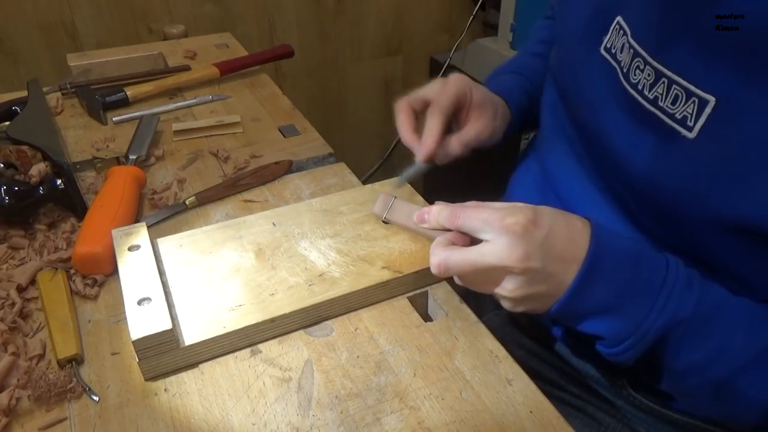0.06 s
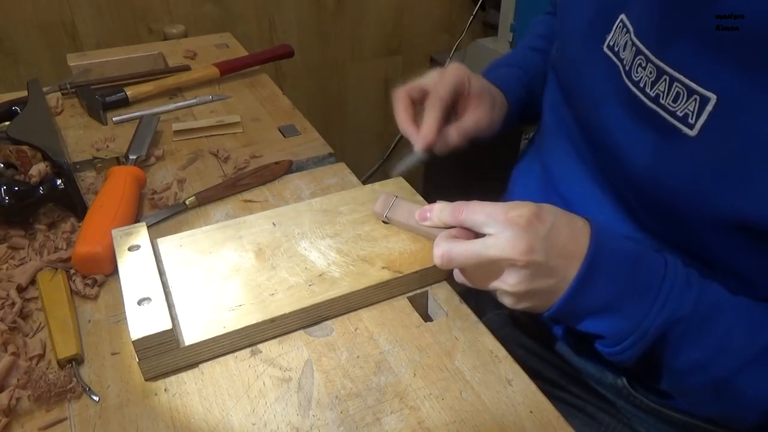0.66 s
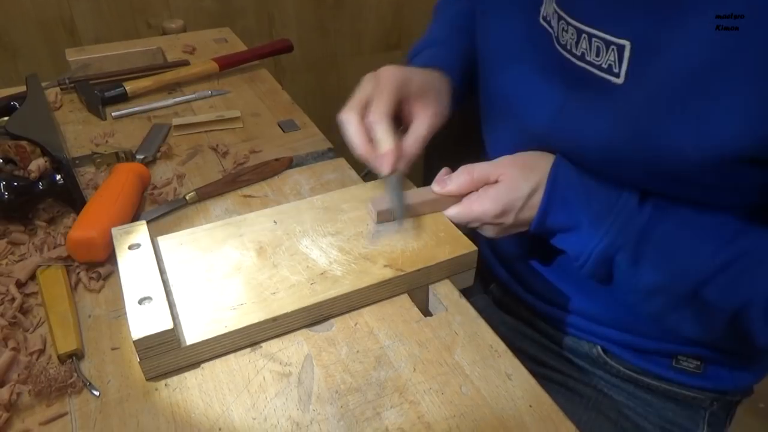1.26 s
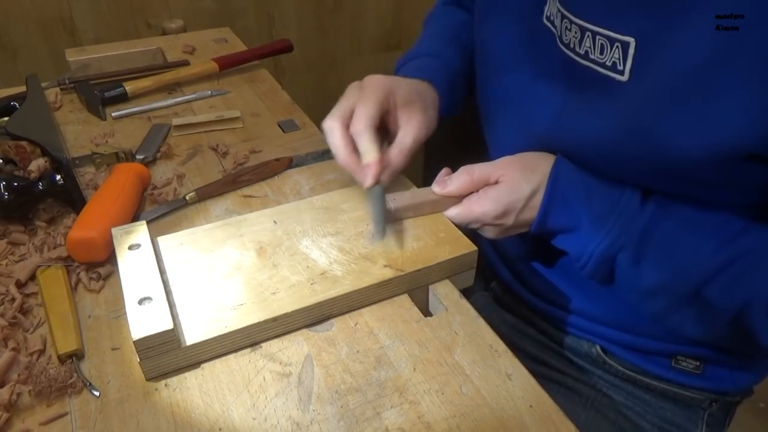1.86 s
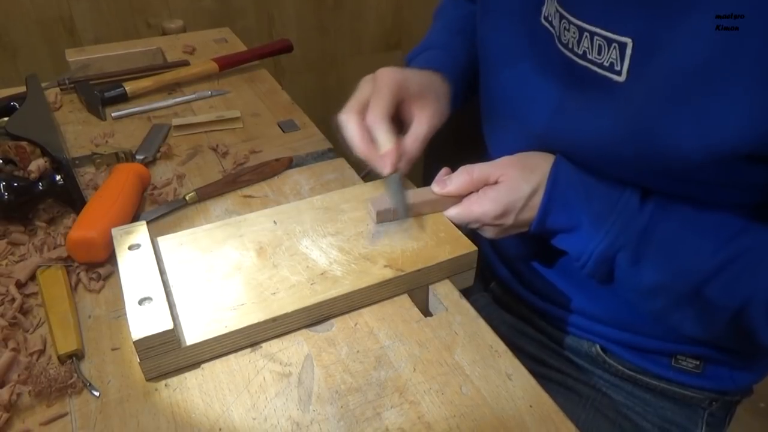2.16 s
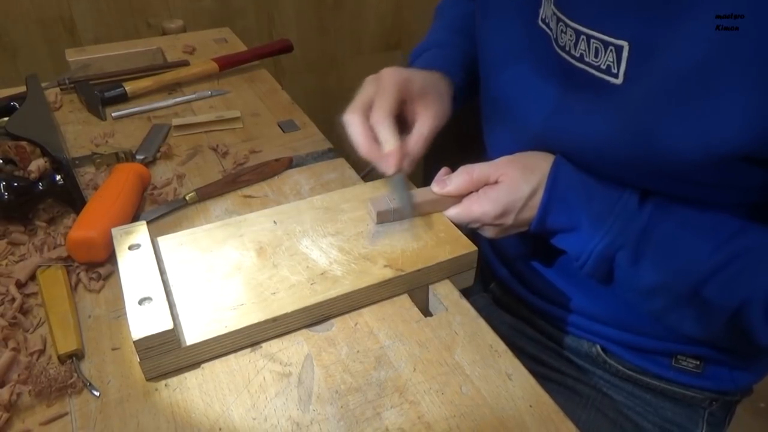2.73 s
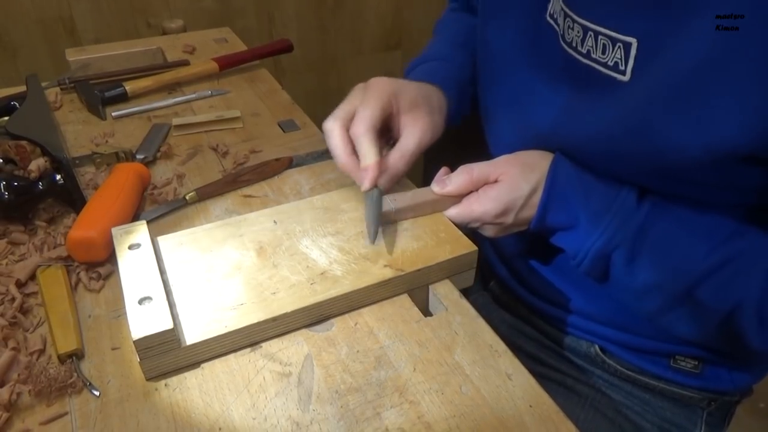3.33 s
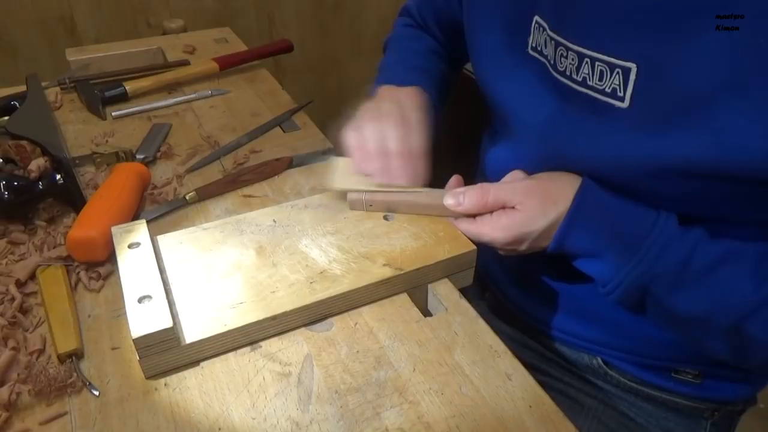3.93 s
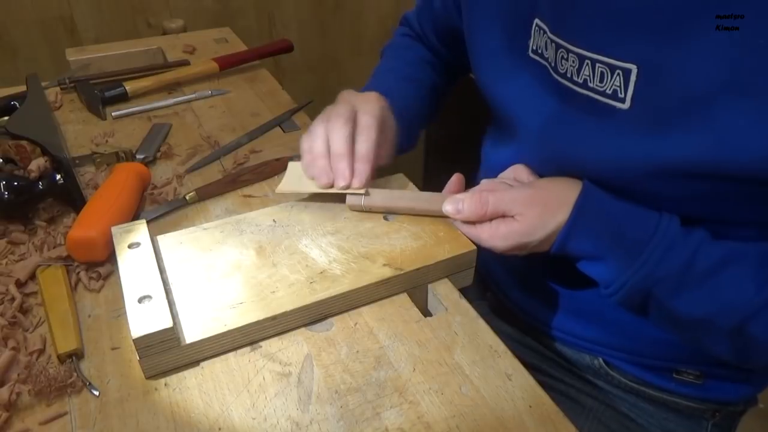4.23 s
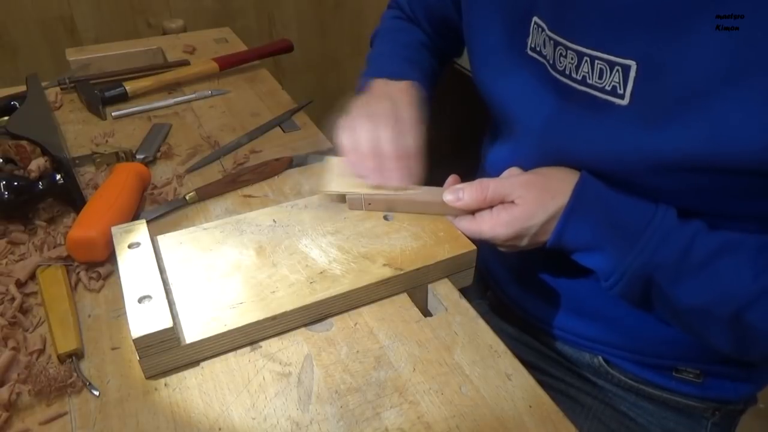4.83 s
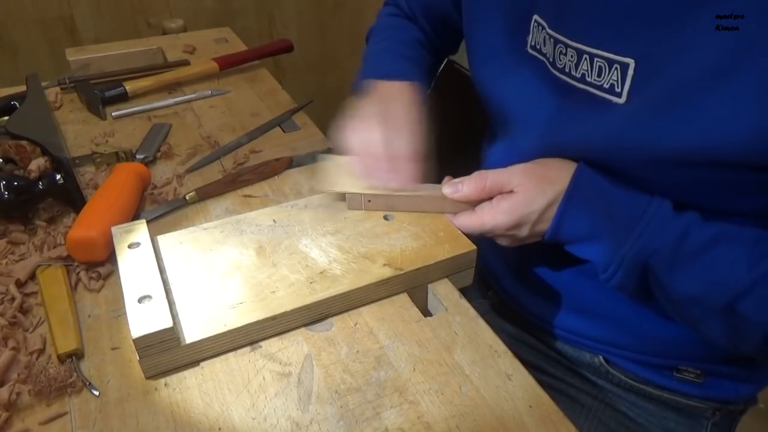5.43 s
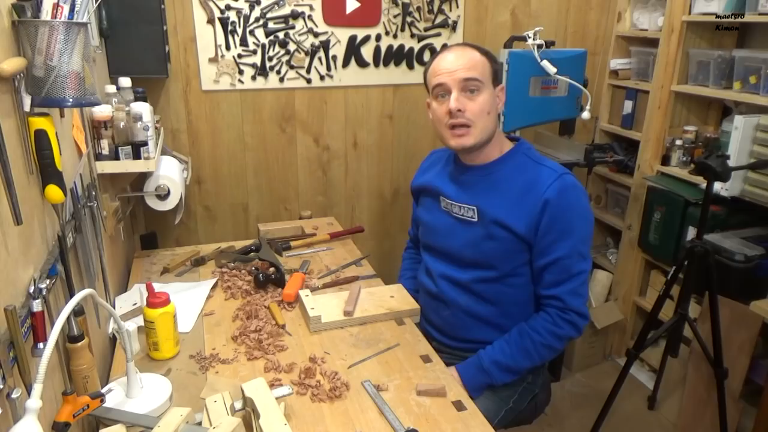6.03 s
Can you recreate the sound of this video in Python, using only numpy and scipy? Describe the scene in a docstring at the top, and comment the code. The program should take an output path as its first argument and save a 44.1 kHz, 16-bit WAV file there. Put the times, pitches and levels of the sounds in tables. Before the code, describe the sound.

A hand file scrapes across a wooden handle in two slow, groaning strokes, each starting with a light tick. It then speeds into quick, even back-and-forth rasping, with a few tiny squeaks and dull bumps of the handle against a board. Brisk sanding follows straight away, a bright rhythmic hiss. It all sounds close, in a small workshop with a faint hum.

```python
"""Filing and sanding a wooden handle.

Two slow file strokes, quick ones to and fro, then sandpaper. The teeth tick at a rate that follows
hand speed; the blade chatters lower as it slides out, higher as it is drawn back. Torn fibres and
grit scrape and hiss, the handle bumps the board now and then, and a small workshop hums faintly."""
import sys
import numpy as np
from scipy import signal
from scipy.fft import rfft, irfft, next_fast_len
from scipy.io import wavfile
from scipy.ndimage import uniform_filter1d

SR = 44100
rng = np.random.default_rng(int(sys.argv[2]) if len(sys.argv) > 2 else 0)


def master(y):
    """Save y as 16-bit WAV."""
    cut = np.clip(np.atleast_2d(y).T, -1, 1)
    pcm = np.round(cut * 32767)  # scale
    wavfile.write(sys.argv[1], SR, pcm.astype(np.int16))


N = 268121
TIME_S = np.arange(N) / SR

# room air spectrum: freq_hz, gain_db
AIR_SPECTRUM = [(15, -41), (25, -21), (54, -12), (118, -12), (131, -8.5), (150, -12.5), (219, -10.5),
                (250, -10.5), (309, -11.5), (415, -12), (462, -21.5), (2370, -35), (15000, -42.5)]
# mains hum partials: pitch_hz, level_db
MAINS_HUM = [(49.5, -60), (150, -53.5), (249, -61.5)]
# file lands on the wood: start_s, level_db
FILE_LANDINGS = [(0.192, -38), (0.817, -34)]
# slow file strokes: start_s, length_s, groan_s, groan_db, sing_db
SLOW_STROKES = [(0.193, 0.255, 0.378, -12.3, -17.5), (0.817, 0.268, 0.988, -11.2, -29)]
# slow scrape spectrum: freq_hz, gain_db
SLOW_SPECTRUM = [(200, -11), (350, 7), (700, -11), (1050, 4.5), (1400, -4.5), (1800, 1), (3000, -3),
                 (3700, 1.5), (4600, -5), (5500, -3.5), (8000, -11.5), (9400, -8), (10300, -15.5),
                 (16000, -21)]
# handle held in the air: freq_hz, width_hz, gain_db
HELD_WOOD_MODES = [(277, 23, 6.5), (361, 61, 2), (640, 56, -8.5), (760, 27, 0), (943, 44, -2),
                   (1280, 72, -29)]
# steel of the file: freq_hz, width_hz, gain_db
FILE_MODES = [(2590, 300, -9.5), (3460, 49, -0.5), (3900, 70, 3), (4950, 130, -13), (7400, 260, -16),
              (9600, 120, -33), (11200, 210, -11.5)]
# handle bumps the board: start_s, level_db, pitch_hz
HANDLE_BUMPS = [(0.437, -28, 327), (1.071, -22, 290), (1.758, -28, 230), (2.085, -28.5, 243),
                (2.108, -22, 124), (2.249, -25, 259), (2.994, -24, 106), (3.539, -30.5, 250),
                (6.044, -30, 130)]
# hiss of the file's smooth tip: freq_hz, gain_db
TIP_SPECTRUM = [(3000, -27), (7000, 2), (9500, 1), (11000, -8), (13000, 2), (14000, -10)]
# quick file strokes, push and pull in turn: start_s, scrape_db, chatter_db
QUICK_STROKES = [(1.266, -18.5, -25), (1.394, -21.5, -20), (1.513, -19.5, -19.5), (1.643, -21.5, -20),
                 (1.76, -19.5, -21.5), (1.885, -22.5, -21), (2.005, -19.5, -41), (2.132, -22.5, -27.5),
                 (2.246, -18.5, -28.5), (2.376, -22, -24), (2.496, -19, -26), (2.624, -22, -30),
                 (2.742, -19.5, -25.5), (2.869, -22, -20.5), (2.992, -19, -23), (3.114, -22.5, -19.5),
                 (3.233, -21, -33.5), (3.36, -22.5, -30.5), (3.48, -23.5, -34), (3.611, -24, -25.5),
                 (3.727, -23, -34.5)]
# push scrape spectrum: freq_hz, gain_db
PUSH_SPECTRUM = [(450, -16), (800, -8.5), (1600, 2), (2300, -13), (3000, -6), (4100, 7), (5400, -2.5),
                 (6300, 2.5), (7800, -10.5), (8700, -3.5), (10400, -7.5), (11200, -9), (12000, -11.5),
                 (16000, -18.5)]
# pull scrape spectrum: freq_hz, gain_db
PULL_SPECTRUM = [(450, -17), (800, 4.5), (1700, 6), (2300, -9), (3100, -4.5), (4150, 11.5), (5100, -4),
                 (6150, 12), (7700, -9), (9200, 2), (11000, -4), (16000, -12.5)]
# handle pressed on the board: freq_hz, width_hz, gain_db
PRESSED_WOOD_MODES = [(652.6, 37, 9.5), (729, 34, 1), (905, 43, 0.5), (992, 20, 10), (1048, 42, 8.5),
                      (1200, 32, -14), (1250, 49, -3), (1360, 25, -22), (1530, 42, -11), (1980, 93, 1)]
# tooth edge skids: start_s, length_s, first_hz, last_hz, level_db
TOOTH_SQUEAKS = [(2.005, 0.018, 1363, 1580, -20), (2.983, 0.036, 1590, 1660, -22),
                 (3.646, 0.0466, 1480, 2003, -20.5)]
# brief level dips: start_s, end_s
LEVEL_DIPS = [(3.79, 3.8), (6.029, 6.08)]
# sanding strokes, away and back in turn: start_s, hiss_db
SANDING_STROKES = [(3.799, -17.5), (3.916, -18), (4.038, -17.5), (4.154, -18), (4.268, -17.5),
                   (4.379, -18.5), (4.491, -16), (4.595, -17.5), (4.709, -16), (4.822, -16.5),
                   (4.938, -15.5), (5.056, -15.5), (5.17, -16), (5.283, -15.5), (5.397, -16), (5.506, -16),
                   (5.616, -17.5), (5.719, -17), (5.826, -17.5), (5.923, -17)]
# grit hiss spectrum: freq_hz, gain_db
HISS_SPECTRUM = [(2000, -34), (6000, -7), (7600, -11.5), (9000, -3), (10500, -2), (11900, -4),
                 (13300, -4.5), (16000, -5.5)]
# grit rubbing the wood: freq_hz, gain_db
RUB_SPECTRUM = [(500, -38), (900, -25), (1100, -24.5), (1300, -23), (1600, -8.5), (2250, -13.5), (3000, -3),
                (4500, -1.5), (6300, 0.5), (7400, -1.5), (12000, -7.5)]
# board rumble spectrum: freq_hz, gain_db
RUMBLE_SPECTRUM = [(50, -53), (180, -10.5), (350, -2), (520, 5), (700, -2.5), (1200, 2.5), (3000, -4)]
# how firmly the sanded handle lies on the board: time_s, rumble_db
RUMBLE_LEVELS = [(3.8, -14), (4.75, -15.5), (5.0, -28), (6.0, -57)]


def undb(db):
    """Decibels to gain."""
    return 10 ** (np.asarray(db) / 20)


def unit(x):
    """Scale to rms 1."""
    return x / np.sqrt(np.mean(x ** 2) + 1e-18)


def add(out, start_s, x):
    """Mix x into out from start_s."""
    i = int(start_s * SR)
    out[i:i + len(x)] += x[:N - i]


def walk(count, rate_hz):
    """Random drift, spread about 1."""
    steps = np.arange(count) * rate_hz / SR
    return np.interp(steps, np.arange(count), rng.standard_normal(count)) / np.sqrt(2 / np.pi)


def colour(x, spectrum):
    """Filter by a curve through (freq_hz, gain_db) points."""
    size = next_fast_len(len(x) + 1024)
    hz, db = np.transpose(spectrum)
    bins_hz = np.maximum(np.fft.rfftfreq(size, 1 / SR), 1)
    gain = undb(np.interp(np.log(bins_hz), np.log(hz), db))
    return irfft(rfft(x, size) * gain, size)[:len(x)]


def ring(x, modes):
    """Drive parallel resonances."""
    return sum(undb(db) * signal.lfilter(*signal.iirpeak(hz, hz / width_hz, SR), x)
               for hz, width_hz, db in modes)


def grains(count, spread_db, flutter_db, flutter_hz):
    """Tiny fractures of unequal size; the contact grips and loosens."""
    size_db = spread_db * walk(count, 5000) + flutter_db * walk(count, flutter_hz)
    return unit(rng.standard_normal(count) * undb(size_db))


def teeth(hz, jitter, slope_db, partials=8):
    """Uneven train of small catches; overtones change by slope_db per octave."""
    phase = 2 * np.pi * np.cumsum(hz * (1 + jitter * walk(len(hz), 406.1))) / SR
    train = np.zeros(len(hz))
    for k in range(1, partials + 1):
        gain = undb(slope_db * np.log2(k) + 3 * walk(len(hz), 66.3))
        train += gain * np.cos(k * phase + rng.uniform(0, 2 * np.pi))
    return unit(train)


def crest(t, peak_s, half_width_s):
    """Rise to 1 and fall, as when a glide crosses a resonance."""
    return 1 / (1 + ((t - peak_s) / half_width_s) ** 2)


def stroke(start_s, end_s, lead, coast_s, bite_s):
    """One hand sweep: time, speed (half sine, first fraction lead skipped) and rising grip."""
    t = np.arange(int((end_s - start_s + coast_s) * SR)) / SR
    speed = np.sin(np.pi * (lead + (1 - lead) * t / t[-1]))
    return start_s + t, np.maximum(speed, 1e-6), 1 - np.exp(-t / bite_s)


def swell(t, db):
    """Pressure shift over a stroke: gain from -db to +db."""
    return undb(db * np.linspace(-1, 1, len(t)))


def workshop():
    """Still air and faint mains hum."""
    air = undb(-46) * unit(colour(rng.standard_normal(N), AIR_SPECTRUM))
    hum = sum(undb(db + walk(N, 4.56)) * unit(np.sin(2 * np.pi * hz * TIME_S)) for hz, db in MAINS_HUM)
    return air + hum


def landings():
    """Steel lands on wood: dry tick, short ring."""
    out, t = np.zeros(N), TIME_S[:SR // 10]
    for start_s, db in FILE_LANDINGS:
        blow = rng.standard_normal(len(t)) * np.exp(-t / 0.0039)
        add(out, start_s, undb(db - 12) * unit(colour(blow, SLOW_SPECTRUM)))
        add(out, start_s, undb(db - 2.5) * unit(ring(blow, HELD_WOOD_MODES)))
    return out


def slow_filing():
    """Tooth rate climbs with hand speed, blade pitch sinks; each swells and rings the handle's modes."""
    first_hz, top_hz, speed_up_s, lift_s = 288.3, 643.4, 0.125, 0.061
    groan_hz, glide_oct_per_s = 374.8, -4.5
    out = np.zeros(N)
    for start_s, length_s, groan_s, groan_db, sing_db in SLOW_STROKES:
        t = start_s + np.arange(int(length_s * SR)) / SR
        tooth_hz = np.interp(t, [start_s, start_s + speed_up_s], [first_hz, top_hz])
        blade_hz = groan_hz * 2 ** (glide_oct_per_s * (t - groan_s))
        ticking = teeth(tooth_hz, jitter=0.058, slope_db=-21)
        blade = teeth(blade_hz, jitter=0.034, slope_db=-12.5)
        # teeth sing just before the blade groans
        tooth_gain = undb(-32.5) + undb(sing_db) * crest(t, groan_s - 0.026, half_width_s=0.013)
        blade_gain = undb(groan_db) * crest(t, groan_s, half_width_s=0.016)
        force = np.hypot(tooth_gain, blade_gain)
        catches = (tooth_gain * ticking + blade_gain * blade) / force
        tearing = undb(9) * grains(len(t), spread_db=2, flutter_db=2, flutter_hz=200)
        chatter = unit(ring(catches + tearing, HELD_WOOD_MODES) + catches)
        fibres = grains(len(t), spread_db=-1, flutter_db=0.5, flutter_hz=280) * (1 + 0.31 * catches)
        scrape = unit(colour(fibres, SLOW_SPECTRUM) + undb(-1.5) * ring(fibres, FILE_MODES))
        lift_off = np.clip((t[-1] - t) / lift_s, 0, 1) ** 2.7
        scrape_gain = undb(-25.5) * (tooth_hz / top_hz) ** 1.46 * lift_off
        add(out, start_s, signal.windows.tukey(len(t), 0.03) * (chatter * force + scrape * scrape_gain))
    return out


def bumps():
    """Handle meets board: one dull, damped tone."""
    out, t = np.zeros(N), TIME_S[:SR // 10]
    envelope = np.exp(-t / 0.0085) * (1 - np.exp(-t / 0.0031))
    for start_s, db, hz in HANDLE_BUMPS:
        add(out, start_s, undb(db) * np.sin(2 * np.pi * hz * t) * envelope)
    return out


def graze(spectrum, start_s, length_s, level_db):
    """Steel brushes the wood without biting: a brief hiss."""
    out, count = np.zeros(N), int(length_s * SR)
    hiss = unit(colour(rng.standard_normal(count), spectrum))
    add(out, start_s, undb(level_db) * np.hanning(count) * hiss)
    return out


def quick_filing():
    """Tooth rate arches with hand speed; the push cuts harder and brightens toward its end."""
    # pairs: push, pull
    stroke_s, swell_db, top_tooth_hz = (0.09, 0.082), (-1, -1.5), (1100, 1103)
    chatter_delay_s, glide_oct_per_s = (0.053, 0.039), (-9.5, 12.46)
    chatter_hz, stop_s = 1056, 3.79
    out = np.zeros(N)
    for k, (start_s, scrape_db, chatter_db) in enumerate(QUICK_STROKES):
        pull = k % 2
        end_s = min(start_s + stroke_s[pull], stop_s)
        t, speed, grip = stroke(start_s, end_s, lead=0.12, coast_s=0.009, bite_s=0.002)
        top_hz = top_tooth_hz[pull] * (1 + 0.06 * rng.standard_normal())
        # hand drags unevenly; teeth bite and skip
        drag = 1 + 0.035 * walk(len(t), 55)
        biting = np.clip(1 + 0.4 * walk(len(t), 70), 0, 1.3)
        zipping = biting * teeth(top_hz * drag * speed ** 0.8, jitter=0.019, slope_db=-1.2)
        fibres = grains(len(t), spread_db=1.5, flutter_db=0.8, flutter_hz=255)
        cutting = fibres + undb(-3.5) * zipping
        # slightly new file angle each stroke
        spectrum = [(hz, db + 1.5 * rng.standard_normal())
                    for hz, db in (PULL_SPECTRUM if pull else PUSH_SPECTRUM)]
        scrape = colour(cutting, spectrum) + ring(cutting, FILE_MODES)
        if not pull:
            treble = colour(scrape, [(6000, -22), (8000, -0.5)])
            scrape += treble * (swell(t, db=4.5) - 1)
        force = unit(grip * np.tanh(1.6 * speed) ** 1.37 * swell(t, swell_db[pull]))
        add(out, start_s, unit(scrape) * force * undb(scrape_db))
        # free blade length grows on the push, shrinks on the pull: pitch glides
        peak_s = start_s + chatter_delay_s[pull]
        glide_oct = glide_oct_per_s[pull] * rng.uniform(0.7, 1.3) * (t - peak_s)
        blade_hz = chatter_hz * (1 + 0.05 * rng.standard_normal()) * drag * 2 ** glide_oct
        blade = teeth(blade_hz, jitter=0.045, slope_db=-19, partials=2)
        # chatter peaks amid the wood's modes
        envelope = grip * (np.exp(-((t - peak_s) / 0.014) ** 2) + 0.52 * speed)
        chatter = blade * envelope * undb(2.8 * walk(len(t), 220))
        add(out, start_s, unit(chatter + 0.5 * ring(chatter, PRESSED_WOOD_MODES)) * undb(chatter_db))
        # cutting keeps the wood ringing
        wood = ring(np.pad(grip * speed ** 0.039 * cutting, (0, len(t))), PRESSED_WOOD_MODES)
        add(out, start_s, unit(wood) * undb(scrape_db - 15))
    return out


def squeaks():
    """A tooth edge skids: short rising chirps."""
    out = np.zeros(N)
    for start_s, length_s, first_hz, last_hz, db in TOOTH_SQUEAKS:
        hz = np.linspace(first_hz, last_hz, int(length_s * SR))
        chirp = teeth(hz, jitter=0.044, slope_db=-10.5, partials=2)
        add(out, start_s, undb(db) * np.hanning(len(hz)) * chirp)
    return out


def dips():
    """Gain that dips briefly at the listed times."""
    depth_db, fade_s = -13.5, 0.0053
    inside = sum(1.0 * ((TIME_S > start_s) & (TIME_S < end_s)) for start_s, end_s in LEVEL_DIPS)
    return undb(depth_db * uniform_filter1d(inside, size=int(fade_s * SR) + 1))


def paper_hiss(reach):
    """The sheet flexes: resonances come and go, the strongest slides and grows with reach (-1 to 1)."""
    swish_hz = 11630 + 500 * reach
    swish_db = np.interp(TIME_S, [4.4, 5.2], [7.5, 3.5]) * (1 + 0.47 * reach)
    sheet = np.zeros(N)
    for hz in np.linspace(3000, 16000, 14):
        bandpass = signal.butter(2, [hz - 550, hz + 550], "band", fs=SR, output="sos")
        band = unit(signal.sosfilt(bandpass, rng.standard_normal(N)))
        nearness = np.exp(-((hz - swish_hz) / 1300) ** 2)
        sheet += band * undb(1.7 * walk(N, 45) + swish_db * nearness)
    return unit(colour(sheet * undb(0.93 * walk(N, 5400)), HISS_SPECTRUM))


def wood_rub(reach):
    """Grit rubs the wood; ring, faint hollow sweep and board rumble are strongest near the turns."""
    grit = grains(N, spread_db=2.5, flutter_db=1, flutter_hz=210)
    hollow_hz = 1250 * 2 ** (0.45 * reach)
    hollow = walk(N, 400) * teeth(hollow_hz, jitter=0.0497, slope_db=-10, partials=2)
    wood = undb(-26.5) * unit(ring(grit, PRESSED_WOOD_MODES)) + undb(-24) * hollow
    rumble_db = np.interp(TIME_S, *np.transpose(RUMBLE_LEVELS))
    rumble = unit(colour(grit, RUMBLE_SPECTRUM)) * undb(rumble_db)
    near_turn = undb(6.5 * (2 * np.abs(reach) - 1))
    return unit(colour(grit, RUB_SPECTRUM)) + (wood + rumble) * near_turn


def sanding():
    """Hand strokes drive paper hiss and wood rub, pausing at each turn."""
    pause_s, friction_knee = (0.0143, 0.02), (2.2, 1.9)  # away, back
    stop_s = 6.03
    hiss_force, rub_force, reach = np.zeros((3, N))
    turns_s = [start_s for start_s, _ in SANDING_STROKES[1:]] + [stop_s]
    for k, ((start_s, hiss_db), turn_s) in enumerate(zip(SANDING_STROKES, turns_s)):
        back = k % 2
        t, speed, grip = stroke(start_s, turn_s - pause_s[back], lead=0.4, coast_s=0.00812, bite_s=0.0051)
        pressure = grip * swell(t, db=3.5)
        friction = np.tanh(friction_knee[back] * speed) ** 2.44  # levels off once sliding
        add(hiss_force, start_s, unit(pressure * friction) * undb(hiss_db))
        add(rub_force, start_s, unit(pressure * speed ** 0.5) * undb(hiss_db - 8.5))
        add(reach, start_s, (-1) ** k * np.linspace(-1, 1, len(t)))
    return paper_hiss(reach) * hiss_force + wood_rub(reach) * rub_force


def room(x, t60_s, treble_t60_s, wet_db):
    """Bench and wall reflections; separate decay above 3 kHz."""
    t = TIME_S[:SR // 2]
    noise = rng.standard_normal(len(t))
    low = signal.sosfilt(signal.butter(2, 3000, fs=SR, output="sos"), noise)
    tail = low * undb(-60 * t / t60_s) + (noise - low) * undb(-60 * t / treble_t60_s)
    tail *= np.clip(t / 0.0076 - 0.5, 0, 1)
    return undb(wet_db) * signal.fftconvolve(x, tail / np.linalg.norm(tail))[:N]


def scene():
    """Work in the centre, the wood's low ring slightly left."""
    rubbing = slow_filing()
    rubbing += graze(TIP_SPECTRUM, start_s=1.004, length_s=0.04, level_db=-30)  # tip slides off
    rubbing += graze(PULL_SPECTRUM, start_s=1.248, length_s=0.021, level_db=-38.5)  # teeth settle
    rubbing += quick_filing() + squeaks() + sanding()
    rubbing += room(rubbing, t60_s=0.22, treble_t60_s=0.18, wet_db=-9.5)
    knocks = landings() + bumps()
    knocks += room(knocks, t60_s=0.25, treble_t60_s=0.17, wet_db=-4.5)
    mid = rubbing * dips() + knocks + workshop()
    side = colour(mid, [(150, -59), (400, -20), (650, -20), (1100, -21.5), (2000, -43), (15000, -82)])
    side += room(mid, t60_s=0.08, treble_t60_s=0.08, wet_db=-32)
    side += undb(-20) * workshop()
    return undb(-1.08) * np.array([mid + side, mid - side])


def record(dry):
    """Steep low-pass."""
    cutoff_hz = 15750
    return signal.sosfilt(signal.ellip(12, 0.1, 80, cutoff_hz, fs=SR, output="sos"), dry)


dry = scene()
out = record(dry)
master(out)
```